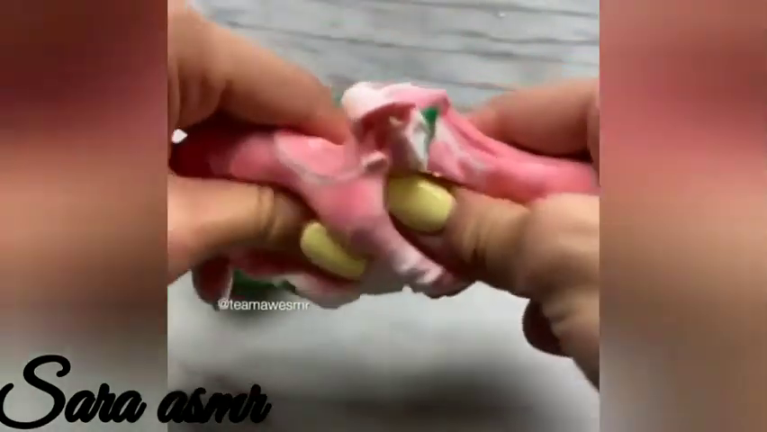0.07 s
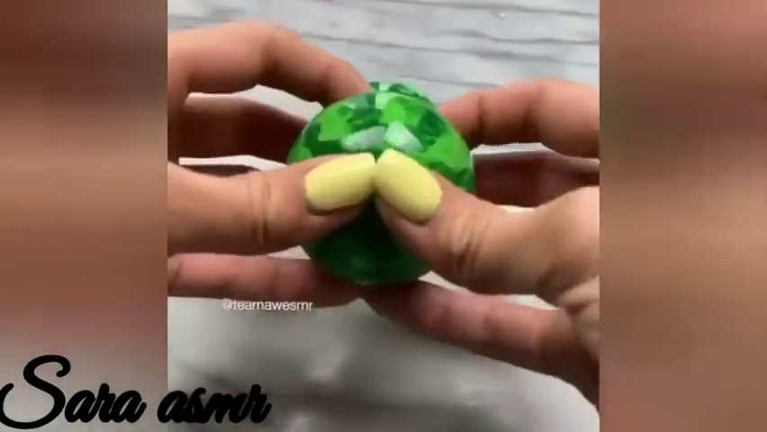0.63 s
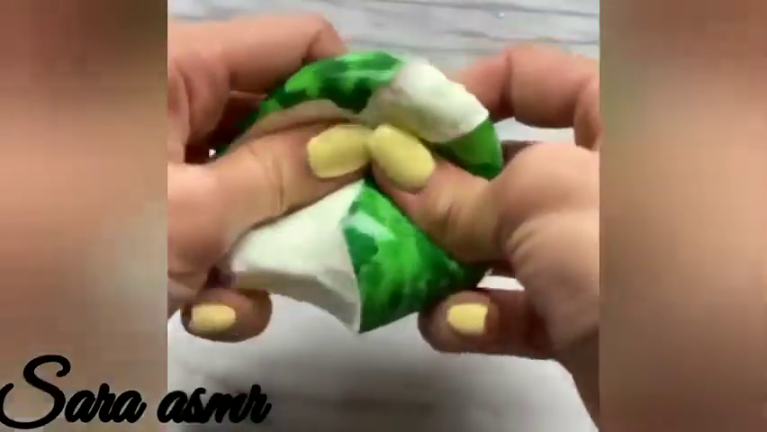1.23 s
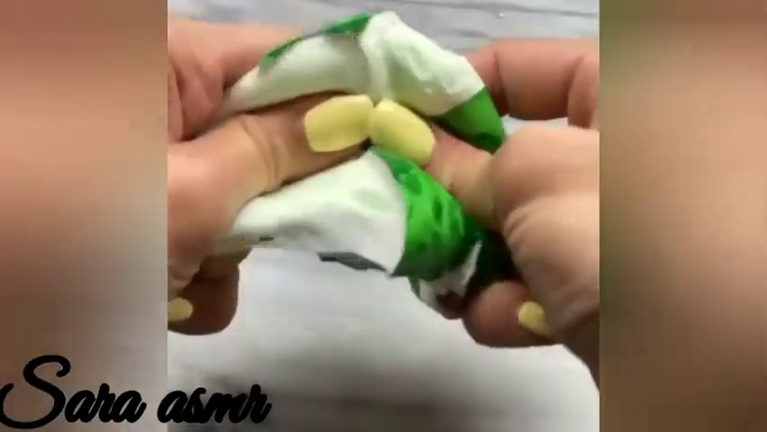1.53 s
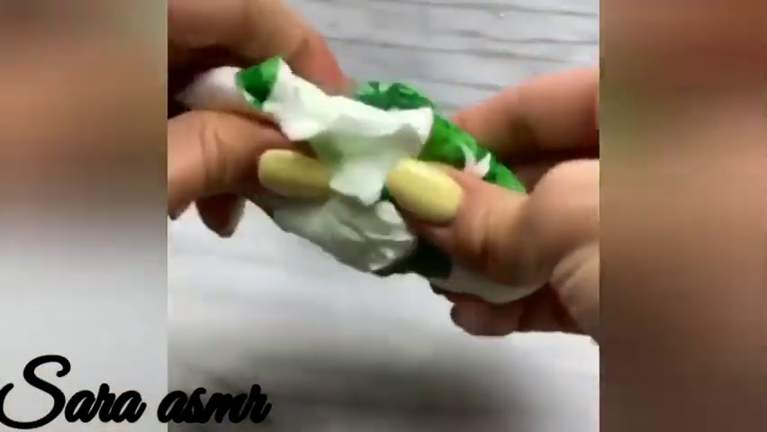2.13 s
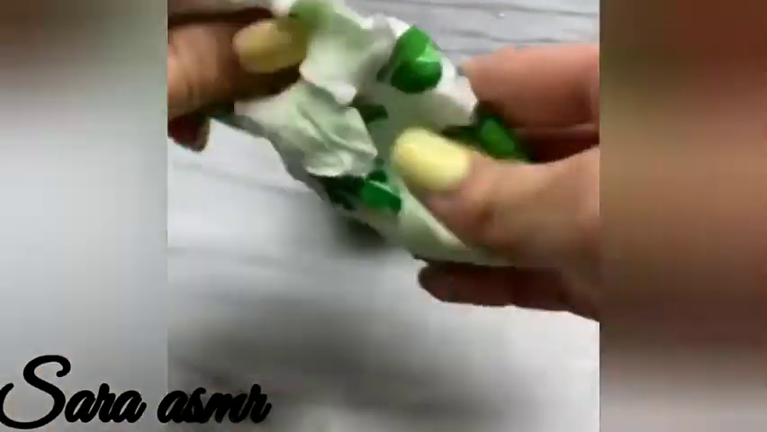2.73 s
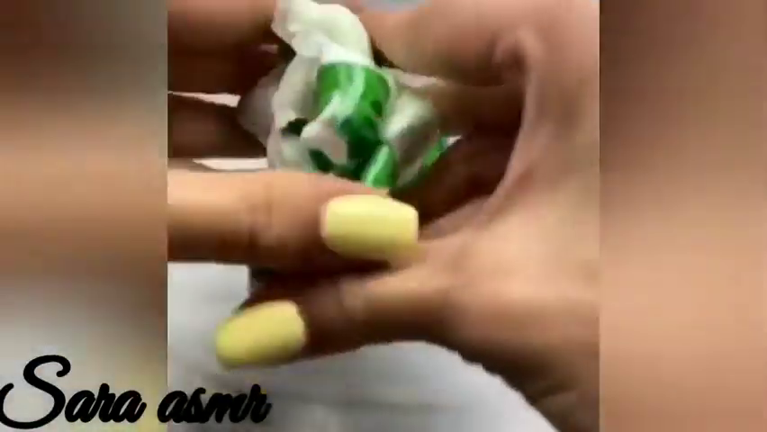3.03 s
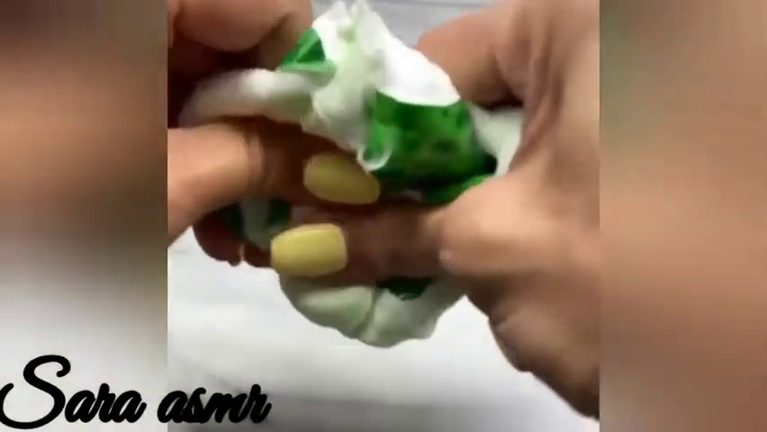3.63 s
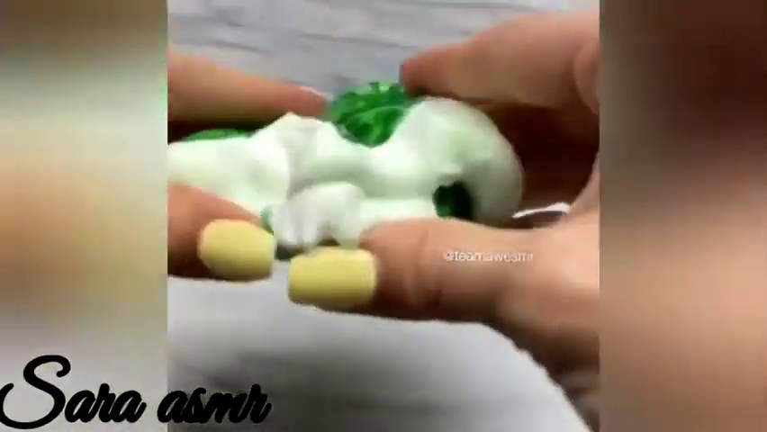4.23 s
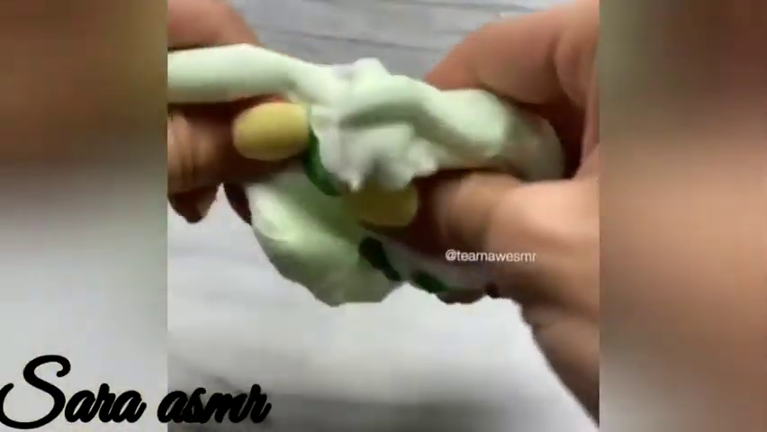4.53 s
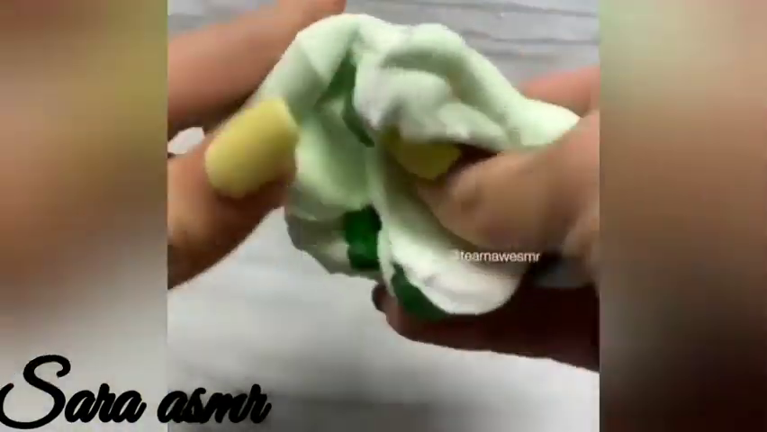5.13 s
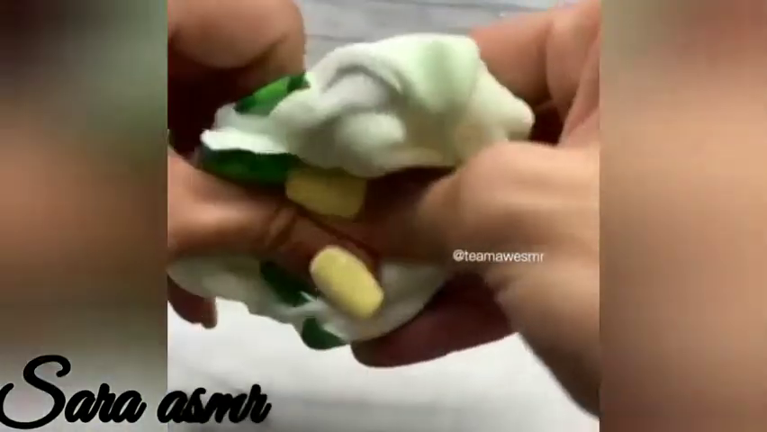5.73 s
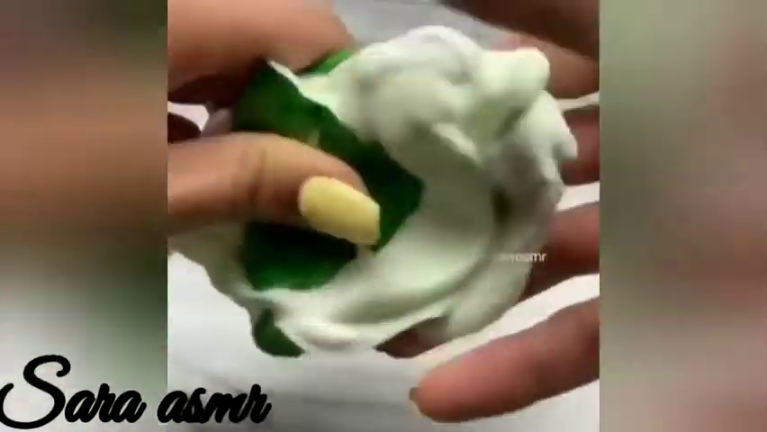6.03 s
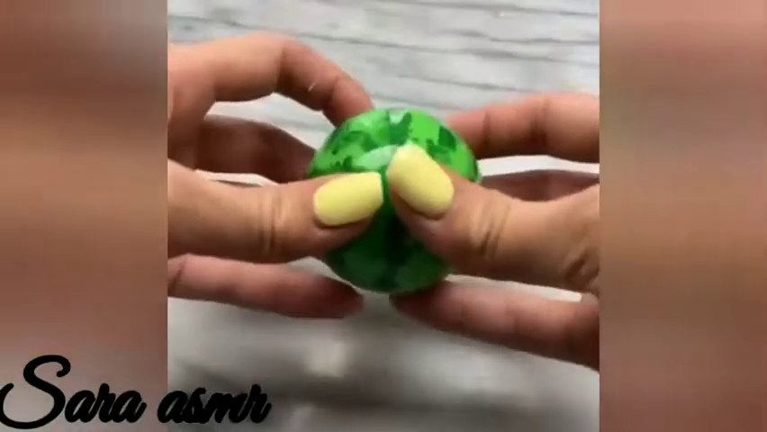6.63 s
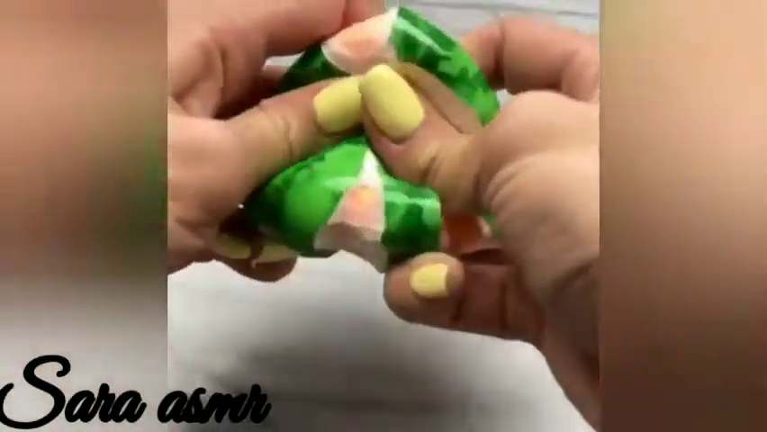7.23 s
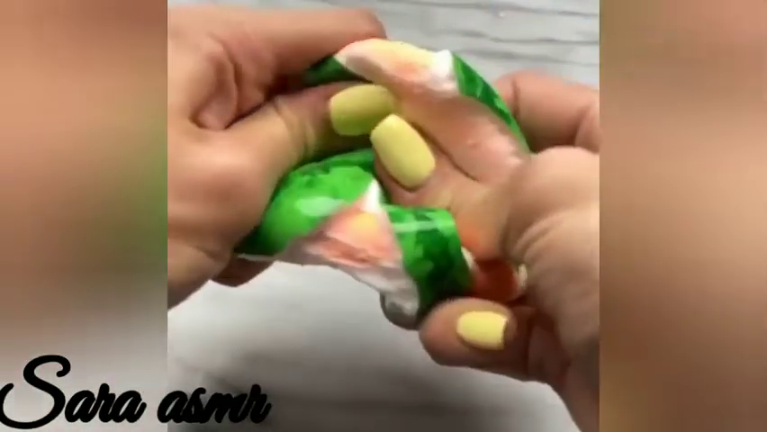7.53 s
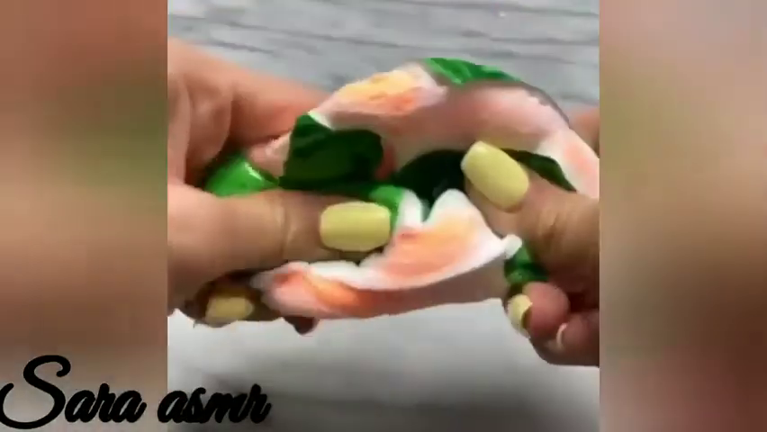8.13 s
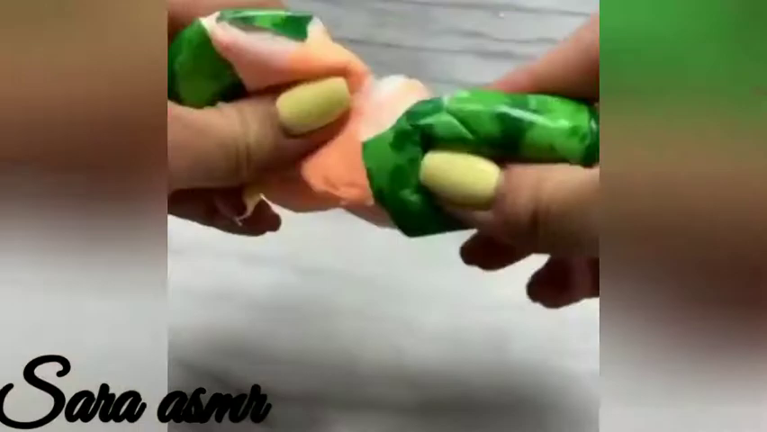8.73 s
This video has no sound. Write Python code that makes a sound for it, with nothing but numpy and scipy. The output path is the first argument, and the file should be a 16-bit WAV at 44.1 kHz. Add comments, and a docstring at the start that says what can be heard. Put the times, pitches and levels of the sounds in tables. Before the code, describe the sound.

Close, crisp cracking comes from a clay ball's hard crust being squeezed by hand in a small room with a low hum. It starts with a dense cluster of snaps and low pops, then grows sparser and brighter as the ball flattens, with crumbly crackles and faint creaks between. Thumbs then break a fresh ball, bringing another loud cluster that fades to a few separate cracks.

```python
"""Fingers crush a thin dried shell over a ball of soft clay, close by in a small, humming room.
First the crust crumbles and creaks faintly. From 0.6 s it breaks in a quick run of snaps: each one
cracks, rings the shell and sends a falling thump through it. The snaps thin out and their thumps rise
as the ball flattens; hands bump the clay and an air pocket pops now and then. At 6.7 s the thumbs start
on a whole ball with another loud run, which thins out too. The loudest peaks are rounded off."""
import sys
import numpy as np
from scipy import signal
from scipy.fft import rfft, irfft, next_fast_len
from scipy.io import wavfile
from scipy.ndimage import uniform_filter1d, map_coordinates

SR = 44100
rng = np.random.default_rng(int(sys.argv[2]) if len(sys.argv) > 2 else 0)


def store_wav(level_fs):
    """Save 16-bit WAV to argv[1]."""
    pcm = np.round(np.clip(np.atleast_2d(level_fs), -1, 1) * 32767)
    wavfile.write(sys.argv[1], SR, pcm.T.astype(np.int16))


N = 396459
TIME = np.arange(N) / SR

# The shell breaks. Each row: start in seconds, relative ring level in dB, ring pitch in Hz, relative
# crack level in dB, tearing time in milliseconds, thump level in dB, echo gain in dB.
FRACTURES = [(0.6358, -11.5, 2410, -19, 2.3, -16, -1.5), (0.6729, -15, 2820, -19.5, 3.1, -11, -5),
             (0.717, -13, 2590, -14, 3.1, -12, -1.5), (0.7739, -20, 2600, -19, 2.2, -19, -4),
             (0.8239, -33, 2760, -16, 5.5, -31, -6), (0.835, -39, 2600, -19, 1.3, -31, -7),
             (0.8481, -33, 2460, -28, 0.9, -30, 6.5), (0.8576, -21, 3020, -16, 2, -19.5, -11),
             (0.8884, -26.5, 2300, -16, 1.8, -29, -3.5), (0.9248, -26, 2520, -27, 0.92, -35, 5),
             (1.0198, -14, 2600, -13, 2.5, -12, -10), (1.069, -18.5, 2380, -18, 0.3, -19, 2.5),
             (1.0802, -17, 2940, -16, 2.6, -13.5, -9), (1.1186, -31, 2780, -25.5, 3.3, -29, -22),
             (1.1557, -16, 2630, -15, 1.5, -17, -10.5), (1.1725, -21, 2440, -18.5, 2.5, -25.5, -20),
             (1.2123, -22, 2850, -13, 2, -28.5, 2), (1.434, -23.5, 3020, -23, 2.5, -32.5, -4.5),
             (1.6075, -21.5, 2790, -48, 0.17, -29, -5.5), (1.867, -61, 2180, -52, 1.4, -69, 1.5),
             (1.935, -45.5, 2330, -42, 1.6, -59, -1.5), (1.9771, -24.5, 2400, -22.5, 1.9, -44, -6.5),
             (2.003, -17, 2250, -20.5, 1.2, -27.5, -12), (2.046, -18, 2430, -18, 2.8, -25, -7),
             (2.1046, -36, 2840, -36, 2, -40, -12), (2.1516, -18.5, 2500, -19.5, 1.5, -24.5, -6.5),
             (2.1853, -14, 2640, -16.5, 4.1, -18, -2), (2.37, -19, 2430, -16, 3.2, -27, -5),
             (2.3769, -18.5, 2520, -20.5, 1.4, -30, -9), (2.3911, -34.5, 2530, -21.5, 3, -42.5, -7),
             (2.5526, -33, 2620, -38, 2.6, -49, 0), (2.581, -29.5, 2310, -31, 1.7, -30, -5.5),
             (2.605, -32.5, 2030, -44, 3, -41.5, -12.5), (2.9092, -29.5, 2340, -23.5, 1.7, -57, -5.5),
             (2.9742, -34, 2420, -53, 0.83, -54, -20), (3.015, -35.5, 2550, -33, 0.85, -52, -6),
             (3.0833, -37, 2400, -37.5, 0.91, -61, -8), (3.1174, -14.5, 2490, -18, 2.8, -34.5, -14),
             (3.1525, -21.5, 2550, -23, 1.6, -37, -5), (3.1853, -32, 2190, -30.5, 0.45, -41, 1.5),
             (3.2055, -17.5, 2240, -18.5, 1.3, -27.5, -7), (3.264, -36, 3200, -23.5, 2.1, -39, -9),
             (3.351, -27, 2300, -20.5, 1, -35, -6.5), (3.4331, -18.5, 2510, -18, 0.79, -32, -12.5),
             (3.5611, -41, 2170, -51, 3.5, -48, 12), (3.6651, -22, 2170, -19.5, 1.34, -26, -8.5),
             (4.106, -32.5, 2700, -32.5, 3.2, -60, -6.5), (4.3812, -19.5, 2370, -16, 1.54, -36, -8),
             (4.4631, -29, 2100, -22.5, 1.2, -47, -22), (4.5042, -17, 2640, -13, 2.6, -28.5, -3),
             (4.8973, -31.5, 2300, -37, 2.1, -63, -20), (5.0798, -28.5, 2400, -43.5, 0.15, -45.5, -34),
             (5.2067, -29.5, 2130, -40.5, 1.1, -49, -9.5), (5.294, -40, 2300, -54, 0.5, -45.5, -3),
             (5.3177, -55, 2340, -48, 1.2, -58.5, 3.5), (5.4268, -49.5, 2420, -48, 1.3, -62, 2),
             (5.446, -45, 2440, -49, 0.8, -58, -1.5), (5.4768, -21, 2620, -16, 0.96, -30.5, -15),
             (5.509, -21.5, 2620, -16, 1.6, -22, -10), (5.807, -31, 2670, -26, 2.1, -33, -7),
             (5.857, -30, 2420, -41, 1.2, -37.5, -17), (6.0714, -52, 2330, -56, 1.6, -73, 2),
             (6.204, -64, 1970, -62.5, 1.2, -53, -8.5), (6.7264, -12, 2450, -22.5, 2, -7, -1.5),
             (6.8259, -15.5, 2720, -14.5, 2.5, -9.5, -11), (6.8341, -17, 2680, -15.5, 3.1, -12.5, 3),
             (6.9232, -17, 2800, -23, 0.91, -29, -12), (6.967, -24, 2560, -16, 3.6, -20.5, -0.5),
             (6.9701, -25, 3480, -23, 5.8, -28, 4.5), (6.997, -24.5, 2360, -17.5, 2.1, -20, -3.5),
             (7.067, -19, 2680, -16.5, 2.3, -12.5, -2.5), (7.081, -30, 2500, -27, 2.3, -29, -10),
             (7.113, -18.5, 2620, -18, 1.9, -23, 1.5), (7.2089, -13.5, 2710, -12, 2.3, -18.5, -3.5),
             (7.2315, -21, 3100, -27, 1, -47, -3), (7.2535, -27, 3450, -27, 2.3, -26.5, -18),
             (7.2852, -16.5, 2970, -17, 1.4, -23.5, 2.5), (7.2945, -23, 3350, -16.5, 6, -13, -2.5),
             (7.3314, -25.5, 2900, -24.5, 2.9, -26.5, 2.5), (7.3446, -18, 2770, -40, 1.7, -34, 0),
             (7.4728, -40, 2350, -41.5, 1.4, -45.5, -7), (7.7516, -34, 2360, -33, 2.1, -37.5, -1.5),
             (8.059, -24, 2600, -15.5, 1.1, -33, -6.5), (8.1281, -30.5, 3300, -24.5, 1.1, -59, -6),
             (8.1424, -35, 2270, -26.5, 1.1, -52, -14), (8.2854, -24.5, 2560, -26, 0.65, -46, -6.5),
             (8.3356, -29.5, 2390, -20, 3, -37, -30), (8.7082, -21.5, 2620, -18, 2, -27, -4),
             (8.7485, -20.5, 2450, -19.5, 2.5, -35.5, -7.5), (8.982, -32.5, 3060, -44, 0.6, -57, 2)]
# The tone of a broken edge. Each row: frequency in Hz, gain in dB.
CRACK_TONE = [(400, -22.5), (1150, -9.5), (1700, -14.5), (3000, -15.5), (3900, -6.5), (5100, 3.5),
              (5800, -3), (6500, 0), (8000, -3), (8800, -7), (9800, -4.5), (11000, -8), (12400, -10.5),
              (14000, -32)]
# Pockets of air burst. Each row: start in seconds, level in dB, lowest pitch in Hz.
AIR_POPS = [(0.6358, -2.5, 58), (2.1511, -16, 850), (6.8357, -9.5, 97.2), (7.3311, -22.5, 110)]
# Squeezes crumble the crust. Each row: peak time in seconds, relative level in dB, half length in seconds.
SQUEEZES = [(0.01, -50.5, 0.033), (0.155, -55, 0.031), (0.641, -20.5, 0.013), (0.865, -22.5, 0.045),
            (1.21, -19, 0.0087), (1.48, -47, 0.09), (1.594, -29, 0.019), (1.714, -34, 0.023),
            (2.207, -25.5, 0.018), (2.3, -43, 0.073), (2.58, -31, 0.038), (2.975, -46.5, 0.064),
            (3.137, -29.5, 0.014), (3.652, -27, 0.011), (3.707, -28, 0.013), (4.22, -50.5, 0.12),
            (4.356, -47, 0.016), (4.846, -28.5, 0.014), (4.935, -33.5, 0.042), (5.005, -38, 0.015),
            (5.13, -46, 0.031), (5.212, -37, 0.019), (5.74, -48.5, 0.044), (5.795, -32.5, 0.018),
            (5.849, -27.5, 0.013), (6.822, -23.5, 0.0088), (6.99, -20.5, 0.016), (7.32, -16, 0.025),
            (7.677, -46.5, 0.049), (7.745, -31, 0.017), (7.795, -30.5, 0.012), (8.37, -27.5, 0.022)]
# The tone of the crumbs. Each row: frequency in Hz, gain in dB.
CRUMB_TONE = [(100, -4.5), (350, -5.5), (700, -7), (1400, -6.5), (2000, -3), (2600, 3), (3500, -5),
              (5200, -3.5), (8000, -6.5), (10500, -8.5), (13000, -18)]
# The shell bends and creaks. Each row: peak time in seconds, level in dB, half length in seconds.
SHELL_CREAKS = [(.183, -57, 0.013), (.5, -60, 0.012), (2.985, -40, 0.032), (5.792, -41, 0.012),
                (7.85, -41.5, 0.01), (8.0, -59.5, 0.056), (8.565, -49.5, 0.011)]
# The ball shifts in the hands.
# Each row: start in seconds, relative level in dB, rough pitch in Hz, seconds to fade by 30 dB.
HAND_BUMPS = [(0.676, -26, 78, 0.14), (0.723, -25.5, 85.5, 0.08), (2.191, -23, 201, 0.034),
              (2.608, -31, 218, 0.03), (3.12, -31, 260, 0.064), (3.563, -36.5, 231, 0.27),
              (3.669, -27, 168, 0.036), (5.861, -27.5, 104.7, 0.059), (6.733, -21.5, 260, 0.027),
              (7.337, -20.5, 75.7, 0.042), (8.349, -41, 220, 0.06)]
# The tone of the snaps' echoes. Each row: frequency in Hz, gain in dB.
ECHO_TONE = [(100, -15.5), (300, 6), (700, -4), (1400, -4), (2500, -4.5), (5000, -5), (8000, -2),
             (10000, 0.5), (13000, -15.5)]
# How long the room's echo lasts. Each row: frequency in Hz, seconds to fade by 60 dB.
ECHO_FADE = [(300, 0.13), (800, 0.59), (2500, 0.53), (8000, 0.5), (13000, 0.053)]
# The steady tones of the hum. Each row: pitch in Hz, average level in dB.
HUM_TONES = [(57.5, -42.5), (172, -64.5), (294, -60.5)]
# The tone of the room's rumble. Each row: frequency in Hz, gain in dB.
RUMBLE_TONE = [(20, -29.5), (35, -3), (55, -16), (80, -1.5), (115, -10), (190, -10), (245, -10), (300, -9),
               (380, -24), (600, -30), (1200, -45.5), (2000, -44), (3000, -41.5), (5000, -48.5),
               (9000, -53), (13000, -60.5)]
# How wide the sound is. Each row: frequency in Hz, gain in dB of what differs between left and right.
STEREO_WIDTH = [(60, -14.5), (250, -6), (700, 2), (1300, -1), (2500, -1.2), (5000, 3), (11000, 2)]

WHOLE_BALL_TIMES_S, COLLAPSE_S = [0.6, 6.7], 2.6  # when a whole ball is begun; how fast it flattens
WHOLE_CRACK_HZ, FLAT_CRACK_HZ = 5470, 6300  # smaller pieces crack brighter
WHOLE_THUMP_HZ, FLAT_THUMP_HZ = 250, 544  # lowest pitch of a medium thump
MEDIUM_THUMP_DB, THUMP_DB_PER_OCTAVE = -23, 17.5  # harder thumps reach lower
HOLLOW_HZ, HOLLOW_WIDTH_HZ = 638, 230  # the air pocket under the shell
LEAN_DB, PAN_SCATTER_DB = -0.4, -1.5  # left-right place of the fractures
SHED_DB, SHED_DELAY_S, SHED_FALL_S = -18.5, 0.005, 0.018  # crumbs after a fracture, set by its thump


def snaps(boost_db=3.0, echo_db=1, same_echo_share=0.44, thump_limit_hz=900):
    """Each fracture cracks, rings, thumps and echoes; a flatter ball cracks brighter and thumps higher."""
    direct, echoes = np.zeros((2, 2, N))
    lead_s = 0.01  # the shell strains just before it breaks
    t = np.arange(SR // 16) / SR - lead_s
    walls = room_echo()
    for start, ring_db, ring_hz, crack_db, tear_ms, thump_db, room_db in FRACTURES:
        flat = flatness(start)
        crack_hz = WHOLE_CRACK_HZ + flat * (FLAT_CRACK_HZ - WHOLE_CRACK_HZ)
        medium_hz = WHOLE_THUMP_HZ + flat * (FLAT_THUMP_HZ - WHOLE_THUMP_HZ)
        octaves_up = (MEDIUM_THUMP_DB - thump_db) / THUMP_DB_PER_OCTAVE
        lowest_hz = min(thump_limit_hz, medium_hz * 2 ** octaves_up)
        pan_db = LEAN_DB + PAN_SCATTER_DB * rng.standard_normal()
        piece = ring_db, ring_hz, crack_db, crack_hz
        snap = shell(tearing(t, tear_ms), *piece, piece_tone(depth_db=6.0))
        hit = amp(boost_db) * snap + thump(t, thump_db, lowest_hz)
        add(direct, start - lead_s, hit * amp([[pan_db / 2], [-pan_db / 2]]))
        # The hands move, so part of the echo is new each time.
        tail = clumped(np.sqrt(same_echo_share) * walls + np.sqrt(1 - same_echo_share) * room_echo())
        low_echo = filtered(tail, lambda f: resonance(f, hz=560, width_hz=1200))
        low_echo = burst(low_echo, min(thump_db, ring_db) + 0.5)
        # All directions blend in the echo, so its tone is more even.
        high_echo = shell(tail, *piece, piece_tone(depth_db=1.0), ring_width_hz=2000, skirt_hz=2956)
        add(echoes, start, amp(room_db + echo_db) * (high_echo + low_echo))
    return direct + toned(echoes, ECHO_TONE)


def tearing(t, tear_ms, strain_db=-21, strain_s=0.0027, settle_db=-29, settle_s=0.0021):
    """Tiny tears multiply, the crack runs for a few milliseconds, and the edges settle."""
    progress = np.abs(t) / (max(tear_ms, .3) / 1000)
    run = (t > 0) * (1 - np.exp(-progress / 0.23)) ** 2 * np.exp(-progress / 1.01)
    strain = amp(strain_db) * np.exp(-np.abs(t) / strain_s)
    settle = amp(settle_db) * np.exp(-np.abs(t) / settle_s)
    return (run + np.where(t < 0, strain, settle)) * stereo_noise(len(t), side_db=-15.5)


def shell(push, ring_db, ring_hz, crack_db, crack_hz, own_tone, ring_width_hz=650, skirt_hz=1900):
    """A piece of shell rings at a pitch set by its size; its broken edge adds the bright crack."""
    def body(f):
        return resonance(f, ring_hz, ring_width_hz) * resonance(f, ring_hz, skirt_hz)

    def edge(f):
        slope = 6 * np.log(crack_hz / 6300)  # a lower crack_hz turns the treble down
        tilt = (np.clip(f, 4000, 10000) / 6300) ** slope
        return amp(look_up(CRACK_TONE, f) + look_up(own_tone, f)) * tilt

    return burst(filtered(push, body), ring_db) + burst(filtered(push, edge), crack_db)


def piece_tone(depth_db):
    """No two pieces ring alike, so each gets random rows of frequency in Hz and gain in dB."""
    hz = np.arange(600, 15000, 600)
    return np.column_stack([hz, depth_db * np.clip(rng.standard_normal(len(hz)), -2, 2)])


def thump(t, db, lowest_hz, sweep=1.2, top_hz=1100, hollow_db=1):
    """Low tones arrive later, so the pitch falls; the hollow of the ball adds a pop."""
    t = np.maximum(t, 1 / SR)
    hz = sweep / t
    offset_turns = 0.071 * np.array([[1], [-1]])  # left and right are slightly out of step
    phase = 2 * np.pi * (sweep * np.log(t) + rng.random() + offset_turns)
    flex = np.sin(phase) * np.exp(-(lowest_hz / hz) ** 2) / (1 + (hz / top_hz) ** 6)
    hollow = filtered(flex, lambda f: 1 + amp(hollow_db) * resonance(f, HOLLOW_HZ, HOLLOW_WIDTH_HZ))
    return burst(hollow, db)


def flatness(time_s):
    """How far the ball has collapsed, from 0 (whole) to 1 (flat)."""
    age = time_s - max(start for start in WHOLE_BALL_TIMES_S if start <= time_s)
    return 1 - np.exp(-age / COLLAPSE_S)


def pops():
    """The ball gives way over a pocket of air: the larger the pocket, the lower the thump falls."""
    out, t = np.zeros((2, N)), np.arange(SR // 10) / SR
    for start, db, lowest_hz in AIR_POPS:
        add(out, start, thump(t, db, lowest_hz))
    return out


def crumbling(crumb_db=-1, echo_db=-13, chip_db=-5):
    """The crust breaks into tiny crumbs under each squeeze and around each fracture."""
    dust = grit(per_second=1000, spread_db=3.5, grain_s=.0013)
    chips = grit(per_second=130, spread_db=3, grain_s=.0007)
    crumbs = toned(patchy(dust + amp(chip_db) * chips, depth_db=3.5), CRUMB_TONE)
    shed = [(start + SHED_DELAY_S, thump_db + SHED_DB, SHED_FALL_S)
            for start, *_, thump_db, _ in FRACTURES]
    level = np.hypot(swells(SQUEEZES), swells(shed, rise=0.2))
    direct = amp(crumb_db) * level * unit(crumbs)
    walls = room_echo()
    echo = signal.fftconvolve(direct, walls / np.linalg.norm(walls[0]), axes=1)[:, :N]
    return direct + amp(echo_db) * echo


def grit(per_second, spread_db, grain_s):
    """A gritty noise made of short grains of unequal size, at random times."""
    sizes = amp(spread_db * np.minimum(rng.exponential(size=N), 3))
    grains = sizes * (rng.random(N) < per_second / SR)
    power = signal.lfilter([1], [1, -np.exp(-2 / (grain_s * SR))], grains ** 2)  # each grain dies away
    return unit(np.sqrt(power) * stereo_noise(N, side_db=-9.5))


def patchy(x, depth_db):
    """Change the tone at random every few milliseconds, so the crumbs sound unalike."""
    spectra = signal.stft(x, nperseg=256)[2]
    patches = uniform_filter1d(rng.standard_normal(spectra.shape[1:]), size=4, axis=0)
    patches = uniform_filter1d(patches, size=4, axis=1)
    return signal.istft(spectra * amp(depth_db * unit(patches)), nperseg=256)[1][:, :N]


def creaking(creak_hz=2480, width_hz=800):
    """Small slips ring the bent shell without breaking it."""
    slips = grit(per_second=180, spread_db=2, grain_s=.0007)
    ringing = filtered(slips, lambda f: resonance(f, creak_hz, width_hz) ** 2)
    return swells(SHELL_CREAKS) * unit(ringing)


def bumps(boost_db=3.5, attack_s=0.00067):
    """Soft, dull knocks of the clay against the fingers."""
    out, t = np.zeros((2, N)), np.arange(SR // 4) / SR
    for start, db, hz, fade_s in HAND_BUMPS:
        noise = stereo_noise(len(t), side_db=-18.0)
        dull = unit(filtered(noise, lambda f: (f / (f + hz / 2)) ** 2 / (1 + (f / (1.3 * hz)) ** 4)))
        shape = (1 - np.exp(-t / attack_s)) * amp(-30 * t / fade_s)
        add(out, start, amp(db + boost_db) * dull * shape)
    return out


def room_echo(early_db=12.0, early_fade_s=0.093, gap_s=0.006, rise_s=0.0058):
    """The room's answer to a click: near walls quickly, then a longer tail."""
    hz, t, spectra = signal.stft(stereo_noise(SR * 2 // 5, side_db=-3.5), SR, nperseg=256)
    late = amp(-60 * t / look_up(ECHO_FADE, hz)[:, None])
    early = amp(early_db - 60 * t / early_fade_s)
    tail = signal.istft(spectra * np.hypot(late, early), SR, nperseg=256)[1]
    return tail * np.clip((np.arange(tail.shape[1]) / SR - gap_s) / rise_s, 0, 1)


def clumped(echo, depth_db=1.5):
    """Echoes arrive in small clumps, a millisecond or two apart."""
    clumps = unit(uniform_filter1d(rng.standard_normal(echo.shape[-1]), size=64))
    return echo * unit(amp(depth_db * np.clip(clumps, -2.5, 2.5)))


def room_hum(rumble_db=-45):
    """A wavering hum, a little to the right, over the low rumble of the room."""
    hum = np.zeros(N)
    for hz, db in HUM_TONES:
        level = amp(db + 0.85 * wobble(per_second=7.6))
        hum += level * np.sqrt(2) * np.sin(2 * np.pi * hz * TIME + .5 * wobble(per_second=11))
    rumble = unit(toned(stereo_noise(N, side_db=-4), RUMBLE_TONE))
    return hum * amp([[-.8], [.8]]) + amp(rumble_db) * rumble


def amp(db):
    """Turn decibels into a number to multiply by."""
    return 10 ** (np.asarray(db) / 20)


def unit(x):
    """Scale x to an average power of 1."""
    return x / np.sqrt(np.mean(x ** 2) + 1e-20)


def burst(x, db):
    """Give x as much energy as 8 milliseconds of sound at this level."""
    energy = np.sum(x ** 2) / len(np.atleast_2d(x))
    return x * amp(db) * np.sqrt((SR * 8 // 1000) / (energy + 1e-20))


def swells(rows, rise=1):
    """A loudness curve with one hump per row; rise is the rising time over the falling time."""
    power = np.zeros(N)
    for peak_s, db, width_s in rows:
        near = slice(*np.searchsorted(TIME, [peak_s - 4 * width_s, peak_s + 4 * width_s]))
        offset = (TIME[near] - peak_s) / width_s
        power[near] += amp(db) ** 2 * np.exp(-np.where(offset < 0, offset / rise, offset) ** 2)
    return np.sqrt(power)


def wobble(per_second):
    """A smooth curve through random points."""
    return map_coordinates(rng.standard_normal(int(N * per_second / SR) + 4), [TIME * per_second])


def stereo_noise(size, side_db):
    """Left and right noise; the lower side_db, the more alike they are."""
    mid, side = rng.standard_normal((2, size))
    return np.array([mid + amp(side_db) * side, mid - amp(side_db) * side])


def resonance(f, hz, width_hz):
    """A filter curve that rings at hz, where its gain is 1."""
    return 1j * f * width_hz / (hz ** 2 - f * f + 1j * f * width_hz)


def look_up(table, hz):
    """Read between the rows of a frequency table, with octaves evenly spaced."""
    freqs, values = np.transpose(table)
    return np.interp(np.log(hz + 1), np.log(freqs), values)


def filtered(x, response):
    """Multiply each frequency f in x by response(f)."""
    n = x.shape[-1]
    padded = next_fast_len(n + 2048, real=True)
    return irfft(rfft(x, padded) * response(np.fft.rfftfreq(padded, 1 / SR)), padded)[..., :n]


def toned(x, table):
    """Filter x by a table of frequencies and gains."""
    return filtered(x, lambda f: amp(look_up(table, f)))


def add(track, start_s, x):
    """Mix x into the track at this time."""
    i = max(round(start_s * SR), 0)
    track[:, i:i + x.shape[-1]] += x[..., :N - i]


def widened(x):
    """Make left and right differ more at some frequencies than at others."""
    mid = (x[0] + x[1]) / 2
    side = toned((x[0] - x[1]) / 2, STEREO_WIDTH)
    return np.array([mid + side, mid - side])


def scene():
    """The breaking shell close by, over the hum of the room."""
    return widened(snaps() + pops() + crumbling() + creaking() + bumps() + room_hum())


def record(dry, ceiling=.9, hardness=5, top_hz=13300):
    """Round off the loudest peaks, then cut the highest treble."""
    rounded = dry / (1 + np.abs(dry / ceiling) ** hardness) ** (1 / hardness)
    return filtered(rounded, lambda f: 1 / (1 + (f / top_hz) ** 50))


dry = scene()
out = record(dry)
store_wav(out)
```